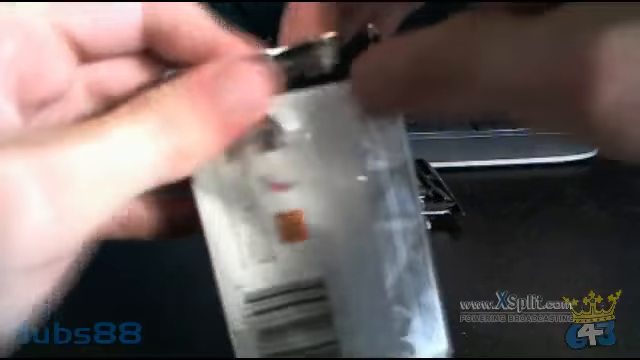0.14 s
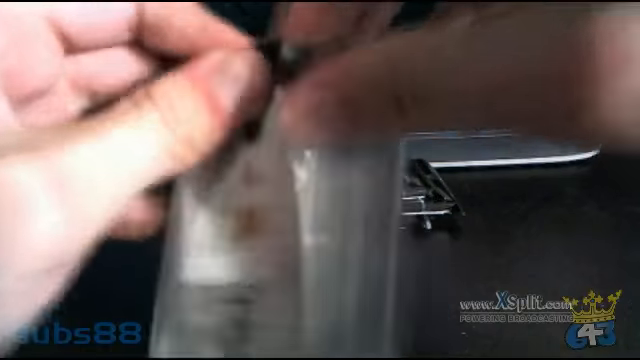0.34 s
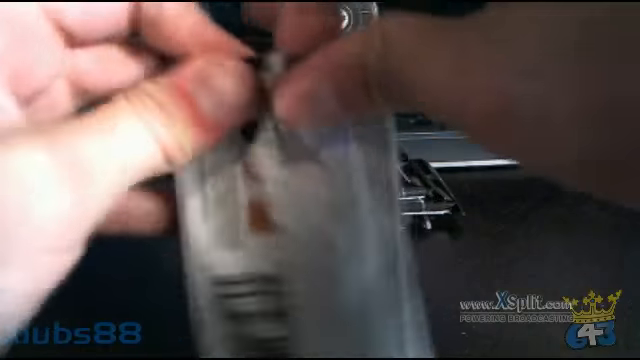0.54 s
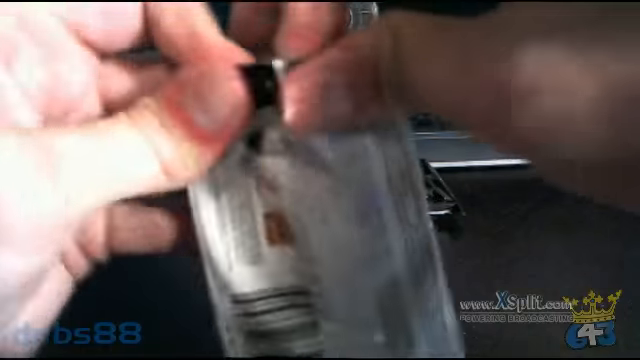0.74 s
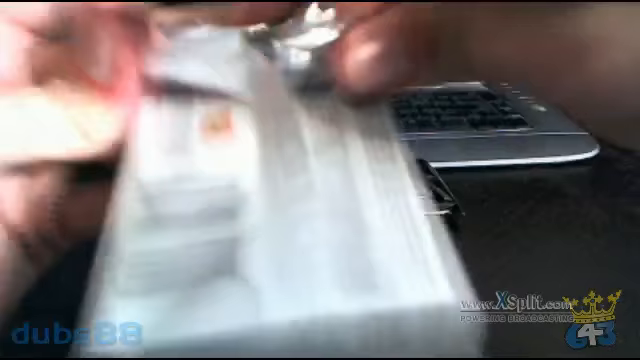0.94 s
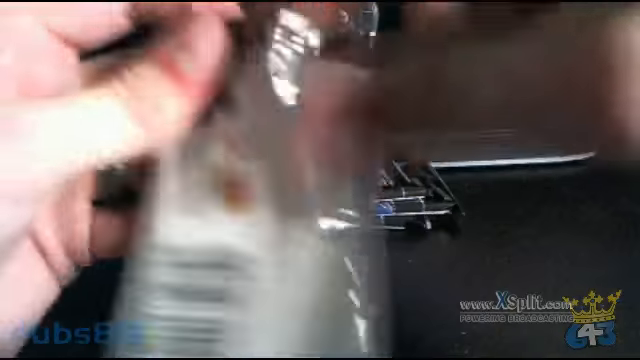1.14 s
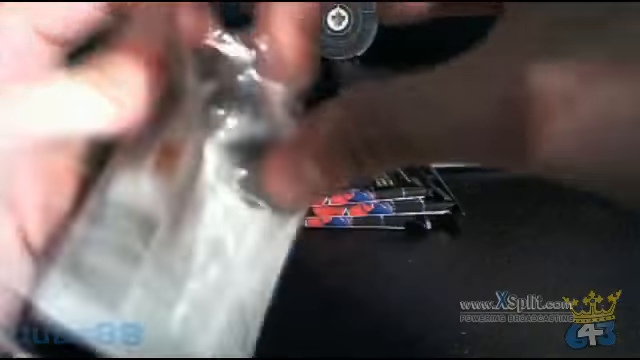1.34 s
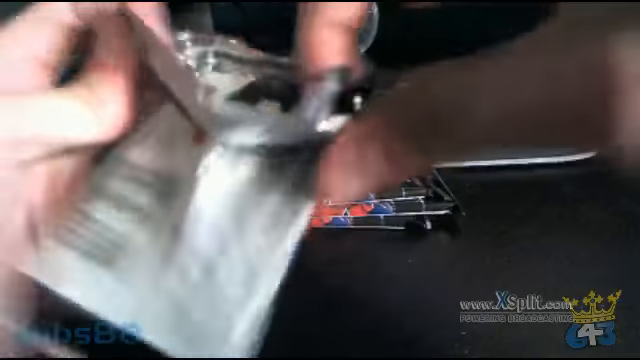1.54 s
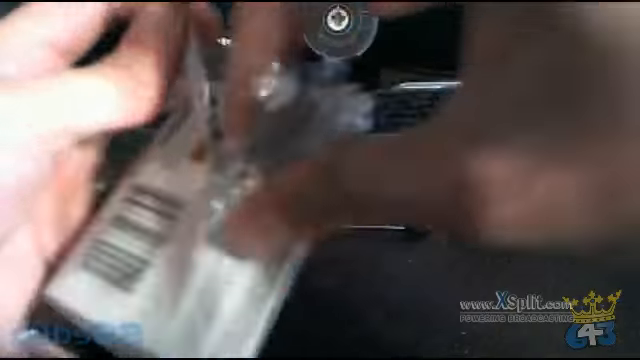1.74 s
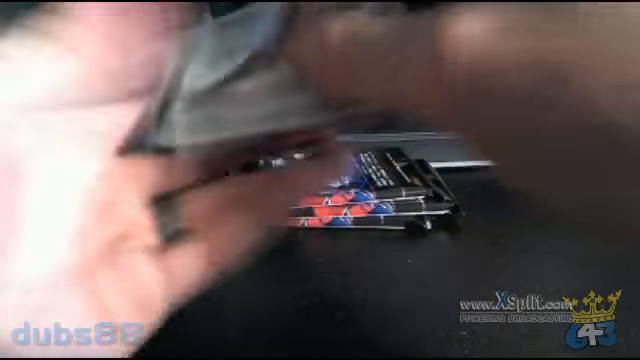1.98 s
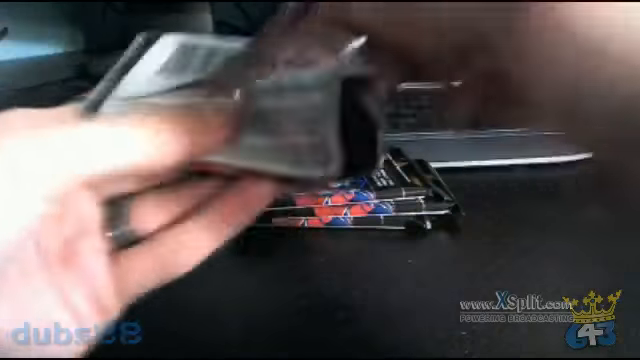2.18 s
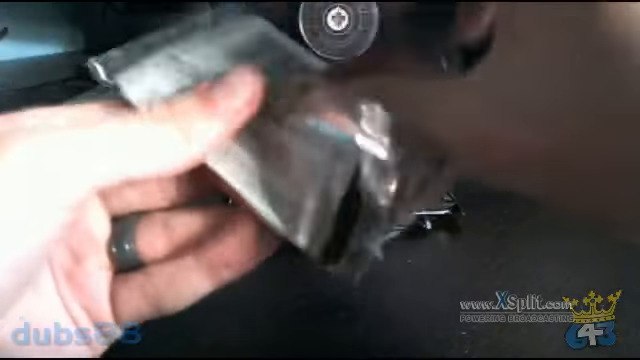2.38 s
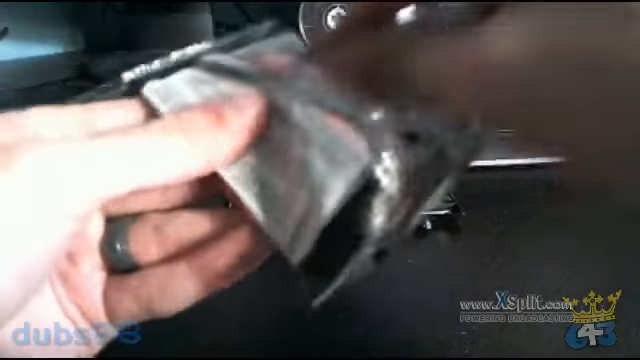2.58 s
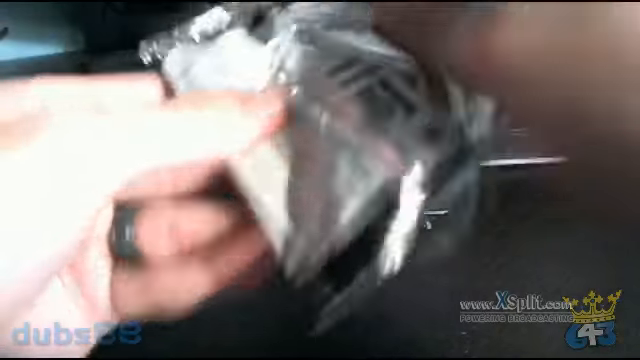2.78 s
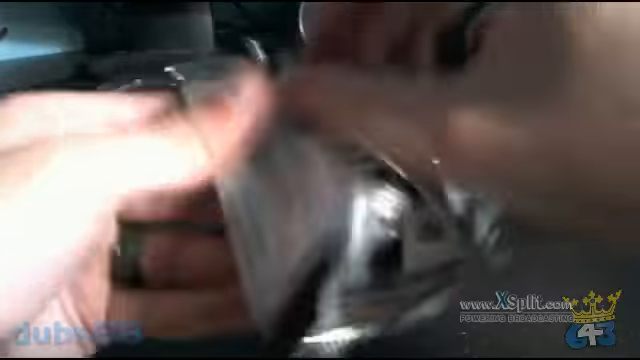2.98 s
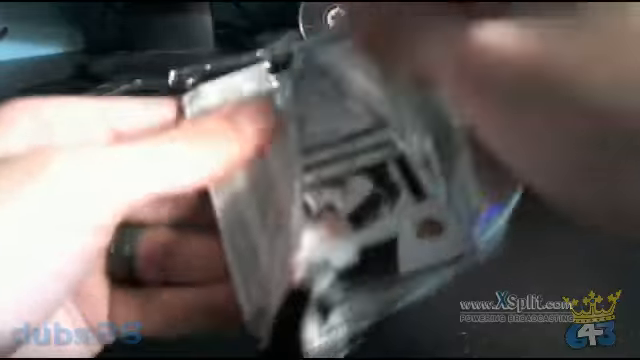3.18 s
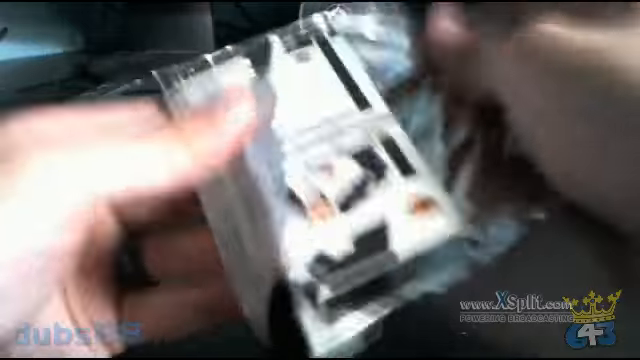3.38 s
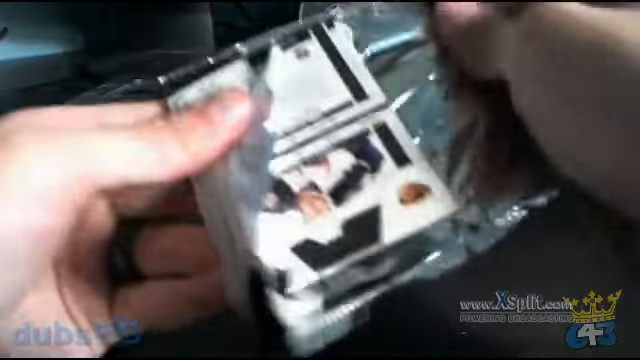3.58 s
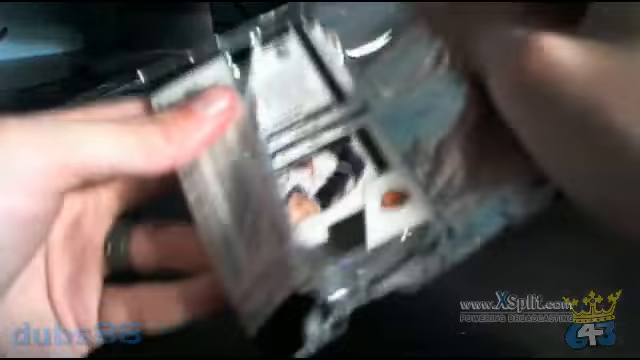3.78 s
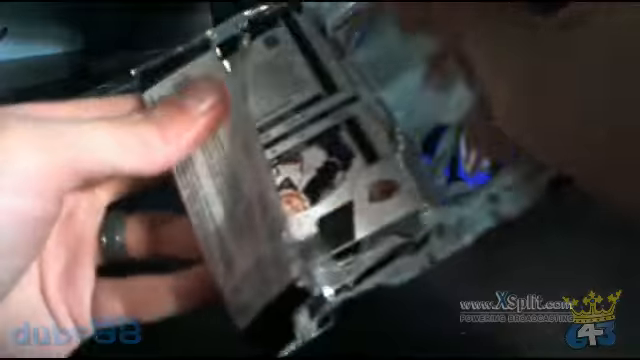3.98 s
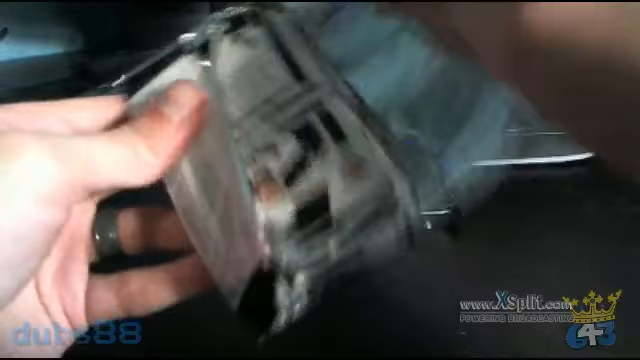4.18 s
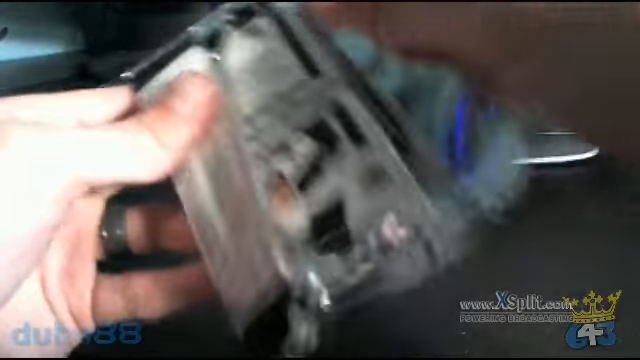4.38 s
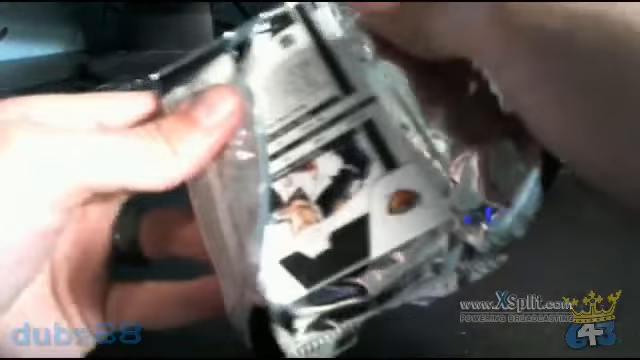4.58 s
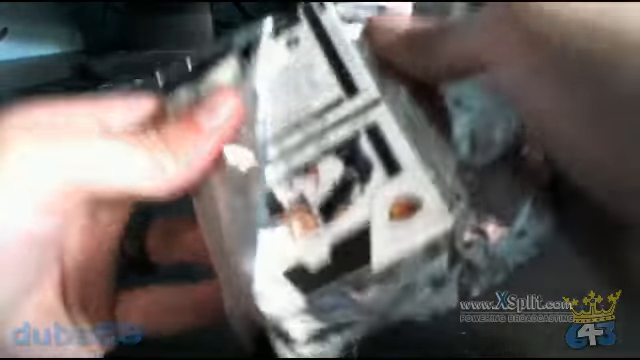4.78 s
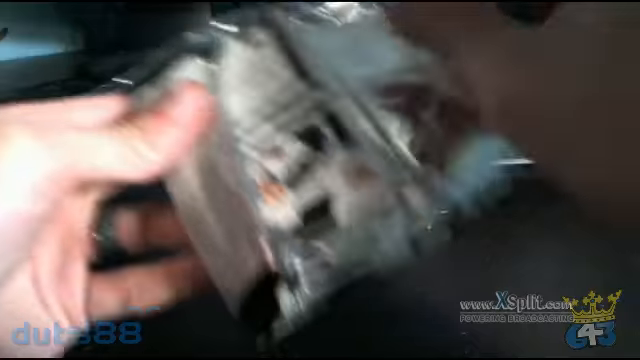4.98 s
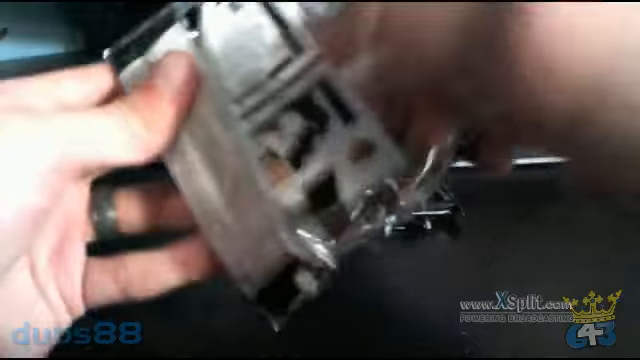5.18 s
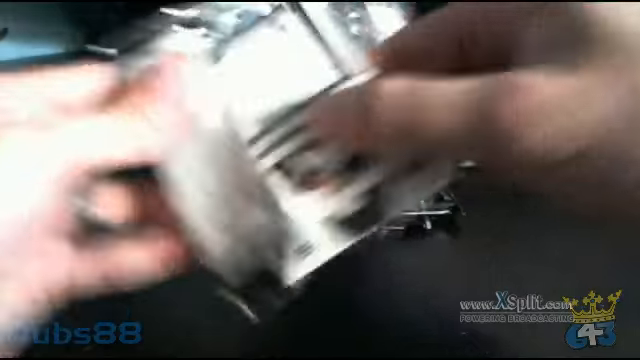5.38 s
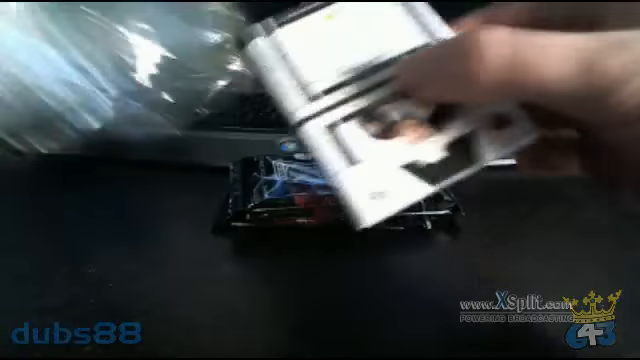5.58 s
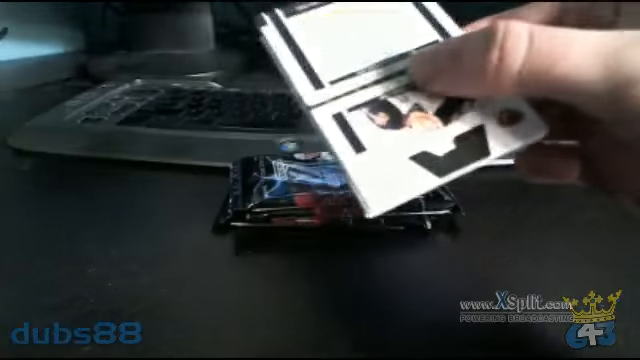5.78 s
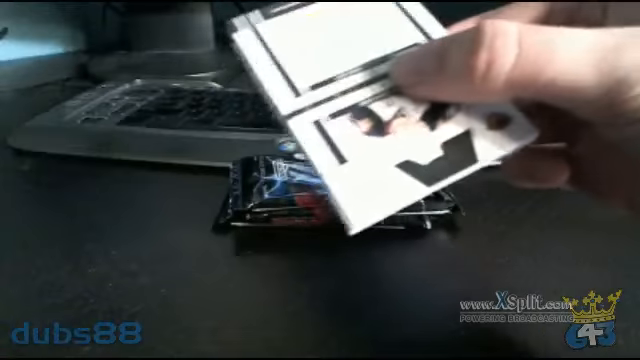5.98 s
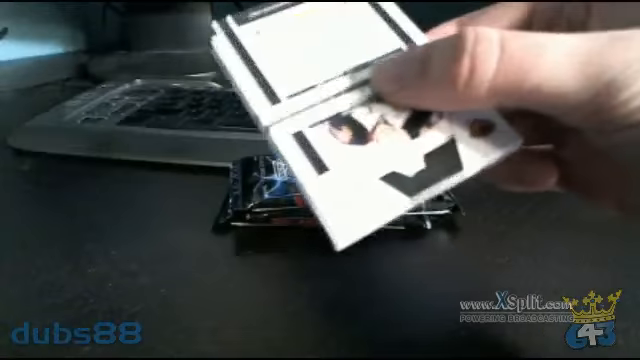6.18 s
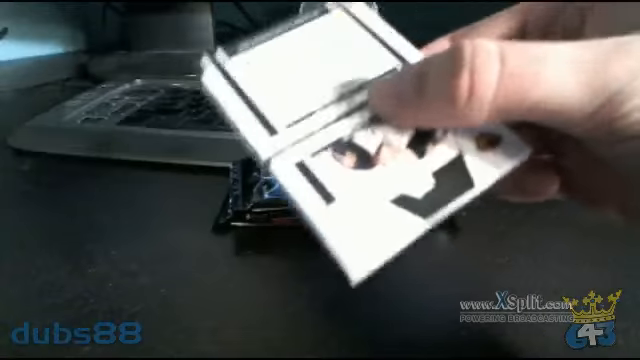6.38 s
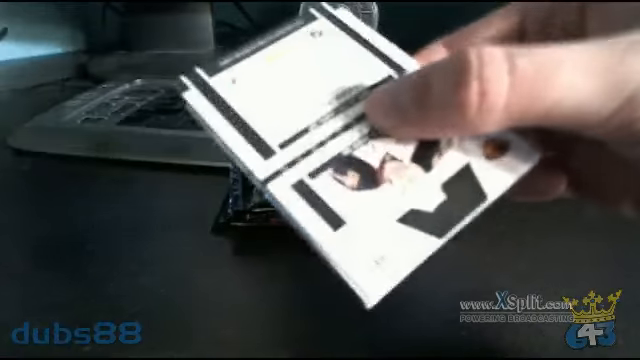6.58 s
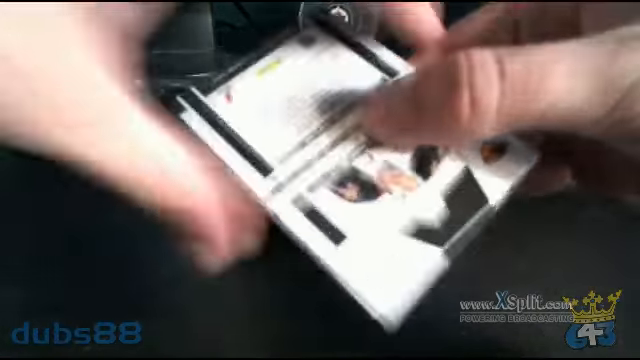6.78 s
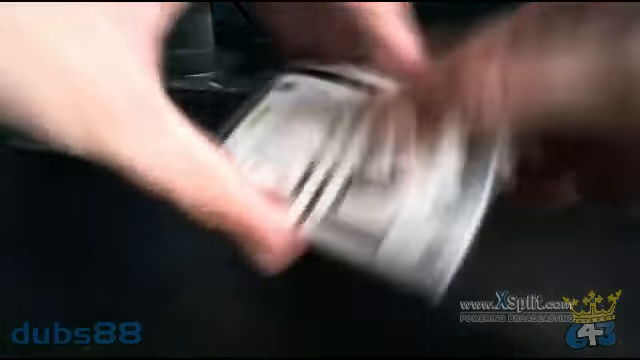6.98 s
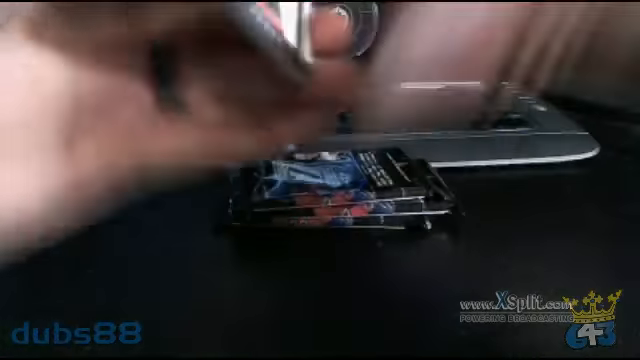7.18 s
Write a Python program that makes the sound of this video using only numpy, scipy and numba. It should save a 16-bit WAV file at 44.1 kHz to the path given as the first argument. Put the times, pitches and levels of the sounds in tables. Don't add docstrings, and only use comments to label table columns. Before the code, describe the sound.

Close, harsh crinkling and ripping of a plastic card packet, with small hollow knocks, giving way to near quiet and a few soft card scrapes.

```python
import sys
import numpy as np
from scipy import signal
from scipy.fft import rfft, irfft, next_fast_len
from scipy.io import wavfile
from scipy.ndimage import uniform_filter1d, minimum_filter1d
from numba import njit

SR = 44100
rng = np.random.default_rng(int(sys.argv[2]) if len(sys.argv) > 2 else 0)


def how_loud(loudness_db):
    steps = np.asarray(loudness_db, float) / 20
    return 10 ** steps


def log_audio(samples):
    frames = np.atleast_2d(samples).T
    limited = np.clip(frames, -1, 1)
    pcm = np.round(limited * 32767).astype(np.int16)
    wavfile.write(sys.argv[1], SR, pcm)


N = 319284

# (start [s], pack rattle re film [dB], pack knock re snap [dB], finger rumble re film [dB])
STAGES = [
    (0, -14.5, -17.5, -17),
    (0.8, -9.5, -17, -15.5),
    (1.5, -12.5, -24.5, -17.5),
    (2.5, -15, -20, -22),
    (3.4, 4.5, -12, -11.5),
    (4.0, 1.5, -18.5, -1),
    (4.449, -11, -17.5, -20),
    (4.95, 0.5, -27.5, -2),
    (5.25, -3.5, -14, -15),
    (5.6, -33, -41, -28.5),
]
# (time [s], peak level [dB], film patch pitch [Hz])
SNAPS = [(0.0054, -13.5, 2750), (0.0399, -14, 2550), (0.1137, -29, 3040), (0.175, -9, 7200),
         (0.184, 1.5, 6840), (0.2115, 1.5, 6000), (0.2763, -7.5, 3570), (0.2897, -2, 3660),
         (0.3108, -4, 4360), (0.332, 1, 4270), (0.3468, -7, 4140), (0.3792, 2.5, 2540),
         (0.3901, -3.5, 5390), (0.57, -14.5, 2840), (0.61, -14.5, 5100), (0.624, -6.5, 4900),
         (0.8236, -11, 1700), (0.997, -6.5, 5000), (1.047, 4.5, 2810), (1.064, 0, 4285),
         (1.0775, -5, 4160), (1.0984, -1.5, 4370), (1.12, 0, 4240), (1.174, -3, 4730),
         (1.2107, -10.5, 4960), (1.292, -10, 4250), (1.3068, -5.5, 3700),
         (1.566, -2.5, 4300), (1.5905, -2, 2950), (1.6117, -2, 3050), (1.6726, 4, 4540),
                (1.6942, 4, 4080), (1.713, -4, 4260), (1.7634, -3.5, 4300), (1.8174, -2.5, 4250),
                (1.8387, 0.5, 3380), (1.87, -0.5, 4580), (1.8855, -10.5, 2760), (1.9102, -10, 4600),
                (1.925, -13, 4700), (1.9835, 1, 4270), (2.159, -6, 4380), (2.183, -7.5, 2910),
                (2.2032, -6, 2630), (2.2185, 0, 2730), (2.254, 1, 5300), (2.3867, -7.5, 3220),
                (2.4673, 0, 3300), (2.482, -3, 3150), (2.5223, -5, 3080),
         (2.7488, 0, 4400), (2.7721, -5, 2620), (2.811, -13, 5140), (2.835, -1, 2670),
              (2.923, 3, 2450), (3.0438, -5, 4390), (3.407, -19, 3580), (3.4146, -2, 4410),
              (3.4548, 0, 3940), (3.4735, -7, 4230), (3.492, -6, 2660), (3.5131, -15, 1950),
              (3.5406, -18, 1990), (3.678, -14, 5500), (3.7212, -4.5, 1630), (3.737, -2.5, 5560),
              (3.7683, -15.5, 2950), (3.782, -18, 3000), (3.8265, -6, 1980), (3.8587, -0.5, 2100),
              (3.897, -15.5, 6300), (4.027, -22, 4200), (4.049, -14.5, 6950), (4.098, -21.5, 5350),
              (4.139, -2, 4870), (4.2757, -20, 6900),
         (4.3897, -0.5, 4520), (4.4428, -2, 5470), (4.4478, 7, 5070), (4.534, -3.5, 5200),
              (4.606, -5, 2700), (4.6262, 3.5, 2160), (4.6647, -5, 5710), (4.7117, -8.5, 4910),
              (4.8425, -13, 5500), (4.8501, -7, 3260), (4.8637, -8.5, 3420), (5.0175, -20, 6850),
              (5.041, -11, 5800), (5.15, -4, 2370), (5.1609, -12, 1640), (5.189, -11.5, 1720),
              (5.2234, -4, 3020), (5.2469, -12, 3330), (5.259, -15, 5340), (5.3415, -17, 4140),
              (5.4029, -12, 2100), (5.4735, -4, 5500), (5.554, -11, 4940), (5.5745, -6.5, 6200),
              (5.637, -19, 7000), (5.699, -8, 2220), (5.712, -14, 2270), (5.7313, -8, 2520)]
# (time [s], peak level [dB], pitch [Hz])
TICKS = [(0.0448, -10, 2460), (0.0893, -25, 3620), (0.153, -24, 3520), (0.1908, -11, 6480),
         (0.1987, -2, 6270), (0.268, -14, 5250), (0.3696, -6, 4450), (0.4683, -3.5, 4320),
         (0.5356, -16, 4350), (0.745, -40, 2600), (0.836, -21, 2670), (0.9601, -1, 3490),
         (0.9662, -3, 3730), (0.9745, -1, 4070), (1.0069, -3, 3840), (1.136, -13, 4230),
         (1.2, -11, 4970), (1.3671, 2, 4270), (1.3764, -11, 4890), (1.4627, 7, 4090),
         (1.5127, -20, 4950), (1.5393, -24, 4220), (1.5586, -9.5, 5200), (1.668, -6.5, 3170),
         (1.6867, -11, 4100), (1.735, -8, 4330), (1.7722, -9, 4430), (1.7895, -2, 6500),
         (1.812, -16, 3100), (1.8911, -11, 4880), (1.9457, -27, 6930), (1.9532, -28, 4600),
         (1.961, -23, 2810), (2.024, -14, 4430), (2.1164, -14, 3950), (2.1734, -7, 4230),
         (2.1888, -4, 2950), (2.2083, -11, 2610), (2.2373, -20, 2130), (2.282, -9, 2420),
         (2.2978, -7, 3530), (2.3255, -6.5, 5380), (2.3597, -19, 2790), (2.3717, -11, 5170),
         (2.425, -32, 2670), (2.4474, -18, 2870), (2.8004, -16, 5540), (2.826, -10, 2780),
         (2.8499, -1, 3010), (2.8715, 1, 4930), (2.9461, -10, 5060), (2.9624, -6, 2940),
         (3.384, -28, 1100), (3.397, -19, 1270), (3.4066, -10, 3700), (3.4245, -8, 5000),
              (3.4497, -4, 5000), (3.5239, -32, 1500), (3.553, -23, 6060), (3.5836, -35, 2830),
              (3.6182, -33, 1150), (3.752, -15, 3380), (3.7984, -14, 6960), (3.834, -0.5, 5730),
              (3.8397, -6, 2600), (3.877, -24, 2670), (3.905, -18, 6300), (3.956, -27, 2700),
              (4.084, -22, 5560), (4.2832, -25, 4250), (4.352, -34.5, 1590), (4.3815, -16.5, 3230),
              (4.41, -6.5, 6210), (4.4334, -22, 2640), (4.4989, -13, 5390), (4.504, -13, 5330),
              (4.5585, -7, 5000), (4.6562, -3.5, 4530), (4.6772, -17, 1890), (4.684, -19, 1110),
              (4.768, -27, 3000), (4.7745, -4.5, 5500), (4.781, -5, 2610), (4.7924, -8, 5950),
              (4.866, -9.5, 6200), (4.8787, -26, 2910), (4.9154, -33, 2790), (4.95, -44, 4370),
              (4.978, -46, 4350), (5.0357, -13, 5500), (5.0493, -8, 5900), (5.121, -18.5, 1700),
              (5.2138, -21, 2900), (5.288, -22, 7140), (5.3256, -20, 6180), (5.3593, -13.5, 5340),
              (5.3958, -18.5, 2200), (5.4178, -27, 4210), (5.4372, -13, 4310), (5.466, -13, 6000),
              (5.478, -10, 4250), (5.481, -12, 4400), (5.5362, -19, 6100), (5.5877, -19.5, 4230),
              (5.647, -19.5, 2600), (5.694, -15, 4500), (5.7783, -23.5, 3335), (6.9493, -28.5, 6560),
              (6.999, -38, 7600)]
# (start [s], length [s], film level [dB], pitch re middle [octaves], rattle re film [dB])
TEARS = [(0.858, 0.21, -14, -0.65, -20.5), (0.859, 0.078, -5, -0.35, -14.5), (1.32, 0.013, -8, 0.26, -13.5),
         (1.394, 0.057, -7, 1, -14.5), (2.263, 0.029, -12, -1.2, -6), (2.522, 0.082, -9.5, 0.77, -19.5),
         (2.554, 0.15, -4.5, -0.4, -15), (2.729, 0.043, -17, -0.59, -14.5),
         (2.855, 0.013, -10, -0.062, -14), (2.884, 0.041, -19.5, -1, 5), (2.944, 0.021, -11, -0.19, -10.5),
         (3.044, 0.049, -13.5, 0.94, -17), (3.062, 0.049, -8, -0.72, -19.5), (3.111, 0.18, -4, -0.56, -15),
         (3.288, 0.048, -19, 0.74, -1.5), (3.43, 0.0072, -14.5, -0.03, 4), (3.828, 0.022, -13.5, -1, -7.5),
         (4.621, 0.055, -25, -0.12, -3), (4.642, 0.0087, -12, 1, -2.5), (4.773, 0.014, -22.5, 0.067, 4)]
# (start [s], length [s], film level [dB], pitch re middle [octaves])
CRUMPLES = [(0.288, 0.031, -17, -1.5), (0.366, 0.029, -21, -3), (0.457, 0.02, -20.5, 0.1),
            (0.531, 0.031, -31, 0.5), (1.093, 0.023, -27.5, 0), (1.709, 0.0092, -14, -0.9),
            (1.778, 0.014, -15.5, 0.2), (1.861, 0.035, -29, 0), (2.065, 0.015, -11.5, -0.5),
            (2.128, .011, -14.5, -0.3), (2.317, 0.011, -13.5, -0.3), (2.985, 0.057, -26.5, 1),
            (3.904, 0.016, -39, 1), (4.117, 0.032, -28.5, 1), (4.681, 0.03, -26, -1),
            (4.839, 0.026, -31, 0), (5.039, 0.016, -22.5, 0), (5.426, 0.015, -27, 0),
            (5.469, 0.0086, -23, 0.5), (5.485, 0.014, -29, 0.7), (5.55, 0.034, -32, -0.5),
            (5.777, 0.011, -36.5, 4.5)]
# (start [s], length [s], film level [dB], pitch re middle [octaves])
RUSTLES = [(.005, 0.036, -23.5, 0.44), (0.088, 0.07, -40, 0.5), (0.17, 0.18, -31, 0.5),
           (0.453, .19, -41, 0.5), (1.066, 0.11, -35, 0.1), (1.305, 0.17, -16, 0.33),
           (1.547, 0.058, -24.5, 0), (1.657, 0.17, -25.5, -0.2), (1.93, .04, -41.5, 1),
           (1.975, 0.2, -27, 0), (2.13, 0.17, -22.5, 0), (2.252, 0.12, -27, 0.2), (2.436, 0.042, -23, 0.2),
           (2.821, 0.13, -18, -0.15), (3.335, 0.028, -35, -10), (3.4, 0.096, -24.5, -2),
           (3.667, 0.2, -40, 1), (4.072, 0.048, -47.5, 0.5), (4.173, 0.068, -53.5, 0.2),
           (4.381, 0.079, -29, -0.2), (4.449, 0.13, -30.5, 0.5), (4.665, 0.15, -45.5, -0.5),
           (5.055, 0.1, -34.5, .9), (4.87, 0.045, -56, 0), (5.258, 0.097, -47.5, 0.5),
           (5.345, 0.068, -32.5, 0.5), (5.398, 0.2, -45, 1.5), (5.689, 0.067, -24, -0.27)]
# (start [s], end [s], hiss level [dB], pitch re middle [octaves], pack rattle re hiss [dB])
SLIDES = [
    (5.96, 6.16, -62, 0.61, -19),
    (6.029, 6.062, -37.5, -1.17, -27),
    (6.03, 6.068, -49, 1, -29),
    (6.469, 6.528, -40.5, 0.34, -13.5),
    (6.543, 6.584, -55.5, 1, -23.5),
    (6.762, 6.822, -49, 0.74, -13.5),
    (6.933, 7.023, -44.5, 0.65, -25),
]
# (time [s], peak level [dB], pitch [Hz])
KNOCKS = [(0.004, -17.5, 742), (0.141, -21, 1056), (0.622, -16.5, 880), (0.823, -23, 877),
          (1.318, -11.5, 820), (1.674, -10.5, 717), (1.983, -12.5, 830), (2.064, -29, 720),
          (2.159, -11.5, 727), (2.261, -18.5, 714), (2.904, -4, 786), (3.062, -4, 804), (3.295, -1.5, 864),
          (3.34, -11.5, 890), (3.43, -14, 700), (3.456, -3.5, 790), (3.705, -18, 770), (3.718, -9, 738),
          (3.767, -14, 740), (4.138, -6, 785), (4.442, -13.5, 714), (4.559, -0.5, 705), (4.631, -8, 730),
          (4.653, -3.5, 800), (4.774, -10.5, 644), (5.036, -23, 820), (5.149, -17.5, 570),
          (0.3253, -18.5, 840), (0.3455, -13, 784), (0.5849, -32, 755), (1.001, -22, 610),
          (1.0594, -11.5, 710), (1.3531, -16.5, 700), (1.3888, -17, 730), (2.0755, -18, 695),
          (2.3103, -13, 450), (2.441, -20.5, 696), (2.8091, -17.5, 865), (2.8675, -16.5, 805),
          (3.2164, -12, 815), (3.239, -9, 790), (3.737, -13.5, 710), (3.917, -19, 703),
          (5.1304, -23.5, 410), (5.1885, -27, 850)]
# (time [s], peak level [dB], pitch [Hz])
BUMPS = [
    (0.625, -30.5, 280),
    (3.455, -18, 199),
    (3.918, -26.5, 330),
    (3.946, -35.5, 255),
    (4.231, -37.5, 320),
    (1.675, -25, 236),
    (4.386, -22.5, 208.5),
    (6.497, -45, 238),
]
# (start [s], length [s], level [dB], start pitch [Hz], end pitch [Hz])
POCKETS = [(0.013, 0.042, -27.5, 2334, 2510), (0.092, 0.042, -36, 3500, 3300),
           (0.521, 0.062, -28, 2800, 3330), (1.95, 0.094, -34.5, 2920, 2730),
           (2.122, 0.057, -26, 2600, 2760), (2.255, 0.04, -25, 5360, 5190),
           (2.982, 0.039, -22.5, 4590, 4850), (3.345, 0.067, -33.5, 1000, 1190),
           (3.495, 0.062, -32, 1096, 1690), (4.089, 0.092, -31, 321, 429), (5.295, 0.092, -33, 6020, 4500),
           (5.347, 0.044, -35.5, 805, 745), (6.021, 0.05, -45, 1193, 1624),
           (6.456, 0.06, -42.5, 2740, 2605), (6.76, 0.057, -46, 4610, 4420), (6.937, 0.09, -45, 3000, 2400)]
# (frequency [Hz], level [dB])
FILM = [(1200, -18), (1900, -16), (2700, -9.5), (3600, -12), (4400, -9.5), (5500, -7.5), (6500, -9),
        (7400, -8.5), (8300, -10), (9300, -32)]
# (frequency [Hz], width [Hz], level [dB])
PACK = [(710, 122, -3.5), (413, 220, -10.5), (1000, 1240, -8)]
# (frequency [Hz], level [dB])
FINGERS = [(20, -26.5), (50, -10.5), (170, 0), (300, -4.5), (450, -7.5), (900, -39)]
# (frequency [Hz], density [dB per Hz])
FAN = [(40, -33), (110, -24), (210, -5.5), (330, -20.5), (600, -21), (1000, -23), (4000, -35.5),
       (7500, -39), (9000, -64.5)]
# (frequency [Hz], width [Hz], level [dB])
FAN_LINES = [(420, 12, -73.5), (541.6, 15, -71.5)]

PATCH_HZ, MIDDLE_HZ = np.array([800, 1700, 2600, 3800, 5500, 10000]), 3000
LOAD_S = .001
KNOCK_DB_PER_OCTAVE = -5
SETTLE_DB, SETTLE_S, HELD_DB, PUT_DOWN_S = -26.5, 0.035, -62, 5.85
DESK_T60_S, DESK_DB = 0.028, -13
FAN_DB = -60
OVERLOAD = .73


def level(x, db):
    return x * how_loud(db) / np.sqrt(np.mean(x ** 2))


def colour(x, points):
    hz, db = np.transpose(points)
    size = next_fast_len(N)
    bins = np.log(np.fft.rfftfreq(size, 1 / SR) + 1)
    gain = how_loud(np.interp(bins, np.log(hz), db))
    return irfft(rfft(x, size) * gain, size)[:N]


def resonate(x, hz, width_hz):
    return signal.lfilter(*signal.iirpeak(hz, hz / width_hz, fs=SR), x)


def walk(rate_hz):
    k = int(SR / rate_hz)
    held = np.repeat(rng.standard_normal(N // k + 1), k)
    return 0.77 * uniform_filter1d(held, k)[:N]


@njit
def add_rings(start, hz, t60, size, turn, quick):
    out = np.zeros(N)
    for g in range(len(start)):
        fall = np.exp(-np.log(1000) / (t60[g] * SR))
        p = fall * np.exp(2j * np.pi * hz[g] / SR)
        z = size[g] * np.exp(1j * turn[g])
        rise, step = 1., fall ** quick
        for i in range(start[g], min(N, start[g] + int(t60[g] * SR))):
            z, rise = z * p, rise * step
            out[i] += z.imag * (1 - rise)
    return out


def ring(start_s, hz, t60_s, db, quick, turn=0.0):
    settings = np.broadcast_arrays(start_s * SR, hz, t60_s, how_loud(db), turn)
    start, *rest = [np.ravel(c).astype(float) for c in settings]
    return add_rings(start.astype(int), *rest, quick)


def stage(s, column):
    rows = np.array(STAGES)
    return rows[np.searchsorted(rows[1:, 0], s), column]


def snap_rows():
    s, db, hz = np.transpose(SNAPS)
    knock_db = stage(s, column=2) + KNOCK_DB_PER_OCTAVE * np.log2(hz / MIDDLE_HZ)
    return np.transpose([s, db + 1.0, hz, knock_db])


def snaps(count=6, cycles=11, lag_s=0.0037, others_db=-7, gain_db=3, knock_hz=720, knock_t60_s=0.028):
    s, db, hz, knock_db = (c[:, None] for c in snap_rows().T)
    lag, size, turn = rng.random((3, len(s), count))
    other = np.arange(count) > 0
    start_s = s + LOAD_S + other * lag_s * (lag - .3)
    other_hz = hz ** .6 * (600 + 11000 * size) ** (1 - .6)
    pitch = np.where(other, other_hz, hz)
    t60_s = cycles / np.sqrt(pitch * MIDDLE_HZ)
    film = ring(start_s, pitch, t60_s, db + gain_db + other * others_db, 3.7, 2 * np.pi * turn)
    note = knock_hz * (0.87 + 0.38 * rng.random(s.shape))
    knock = ring(start_s[:, :1], note, knock_t60_s, db + knock_db, 2.3)
    return film + crack(start_s[:, :1], db, hz) + knock


def ticks(count=4, cycles=12, others_db=-6, gain_db=5, lag_s=0.0013):
    s, db, hz = (c[:, None] for c in np.transpose(TICKS))
    size, lag, turn = rng.random((3, len(s), count))
    other = np.arange(count) > 0
    pitch = np.where(other, np.sqrt(hz * (900 + 10500 * size)), hz)
    start_s = s + LOAD_S / 2 + other * lag_s * (lag - .3)
    t60_s = cycles / np.sqrt(pitch * MIDDLE_HZ)
    film = ring(start_s, pitch, t60_s, db + gain_db + other * others_db, 4.5, 2 * np.pi * turn)
    return crack(start_s[:, :1], db, hz) + film


def crack(start_s, db, hz, t60_s=.0011, gain_db=-2.):
    return ring(start_s, hz, t60_s, db + gain_db, 20.)


def effort(table, rise_ms, fall_share, spread, widen, swell=0):
    octave = np.log2(np.sqrt(PATCH_HZ[1:] * PATCH_HZ[:-1]) / MIDDLE_HZ)
    power = np.zeros((len(octave) + 1, N))
    for s, end, db, centre, rattle_db in table:
        a, b = max(int((s - .03) * SR), 0), min(int((end + .15) * SR), N)
        ms = (np.arange(a, b) / SR - s) * 1000
        length_ms = max(end - s, .002) * 1000
        rise = np.minimum(ms, 0) / rise_ms
        fall = np.maximum(ms - length_ms, 0) / (1 + fall_share * min(length_ms, 50))
        shape = np.exp(rise - fall)
        shape *= 1 - min(swell, .95) * np.exp(-np.maximum(ms, 0) / (0.78 * length_ms))
        width = max(spread + widen * (db + 49.5), .4)
        share = np.exp(-.5 * ((octave - centre) / width) ** 2)
        gains = np.append(share / share.mean(), how_loud(2 * rattle_db))
        power[:, a:b] += how_loud(2 * db) * shape * gains[:, None]
    return power


def spans(table):
    return [(s, s + length, *rest) for s, length, *rest in table]


def with_rattle(table):
    return [(*row, stage(row[0], column=1)) for row in spans(table)]


def rips():
    moves = with_rattle(CRUMPLES) + spans(TEARS)
    creaks = [(s, s + 0.0033, db - 23.5, np.log2(hz / MIDDLE_HZ), knock_db + 11.5)
              for s, db, hz, knock_db in snap_rows()]
    pulled = effort(moves, rise_ms=1.0, fall_share=0.13, spread=0.6, widen=0.015, swell=.4)
    return pulled, effort(creaks, rise_ms=1.0, fall_share=0.55, spread=1.0, widen=0)


def rustles():
    return effort(with_rattle(RUSTLES), rise_ms=1.0, fall_share=.14, spread=0.49, widen=0.0036, swell=0.9)


def slides():
    return effort(SLIDES, rise_ms=1.74, fall_share=0.17, spread=0.58, widen=0, swell=0.2)


def settle(power):
    keep = np.exp(-1 / (SETTLE_S * SR))
    after = how_loud(2 * SETTLE_DB) * signal.lfilter([1 - keep], [1, -keep], power.mean(axis=0))
    held = how_loud(2 * HELD_DB) * (np.arange(N) < PUT_DOWN_S * SR)
    return after + held


def creases(per_s=4000, cycles=10, scatter_db=4.0, hiss_db=-9):
    when, size, strength, turn = rng.random((4, int(per_s * N / SR)))
    pitch = 800 + 8600 * size
    db = -scatter_db * np.log(strength + 0.0014) + 10 * np.log10(pitch)
    grains = ring(when * N / SR, pitch, cycles / pitch, db, 4.7, 2 * np.pi * turn)
    return level(grains, 0) + level(rng.standard_normal(N), hiss_db)


def patches(x, patchy_db):
    sheet = level(colour(x, FILM), 0)
    bands = []
    for edge in zip(PATCH_HZ, PATCH_HZ[1:]):
        band = signal.butter(2, edge, "band", fs=SR, output="sos")
        bands.append(signal.sosfiltfilt(band, sheet) * how_loud(patchy_db * walk(35)))
    return np.array(bands)


def kicks(share, scatter_db):
    chance, sign, strength = rng.random((3, N))
    pushes = (chance < share) * np.sign(sign - .5)
    return level(pushes * how_loud(-scatter_db * np.log(strength)), 0)


def pack(push, gain_db=17):
    pushed = push * kicks(0.099, 2.64)
    return how_loud(gain_db) * sum(how_loud(db) * resonate(pushed, hz, width_hz) for hz, width_hz, db in PACK)


def knocks(t60_s=0.024, gain_db=5.0, upper=1.7, upper_db=-14):
    s, db, hz = np.transpose(KNOCKS)
    low = ring(s, hz, t60_s, db + gain_db, 3.6)
    return low + ring(s, upper * hz, t60_s, db + gain_db + upper_db, 2.5)


def bumps(t60_s=0.032):
    s, db, hz = np.transpose(BUMPS)
    return ring(s, hz, t60_s, db + 13.0, 6.5)


def fingers(push, smear_s=0.0095):
    slow = np.sqrt(np.abs(uniform_filter1d(push ** 2, int(smear_s * SR))))
    return slow * level(colour(kicks(0.018, 3.7), FINGERS), 0)


def pockets(width=.22, edge=0.58):
    out = np.zeros(N)
    noise = rng.standard_normal((2, N))
    for s, length_s, db, hz, end_hz in POCKETS:
        a, n = int(s * SR), int(length_s * SR)
        k = max(int(SR / (width * (hz + end_hz))), 2)
        wobble = uniform_filter1d(uniform_filter1d(noise[:, a:a + n], k), k)
        turn = 2 * np.pi * np.cumsum(np.geomspace(hz, end_hz, n)) / SR
        hiss = wobble[0] * np.cos(turn) + wobble[1] * np.sin(turn)
        out[a:a + n] += level(hiss, db) * np.hanning(n) ** edge
    return out


def desk(near):
    t = np.arange(SR // 5) / SR
    blur = rng.standard_normal(len(t)) * how_loud(-60 * t / DESK_T60_S) * (t > .001)
    blur *= how_loud(DESK_DB) / np.sqrt(np.sum(blur ** 2))
    return signal.fftconvolve(near, blur)[:N]


def fan():
    air = level(colour(rng.standard_normal(N), FAN), FAN_DB) * how_loud(.8 * walk(4.9))
    return air + sum(level(resonate(rng.standard_normal(N), hz, width_hz), db) for hz, width_hz, db in FAN_LINES)


def scene():
    pulled, creaks = rips()
    rustle = rustles()
    rip = pulled + rustle
    rip[:-1] += settle(rip[:-1])
    rubbed = 0.25 * rustle
    rip = rip + creaks - rubbed
    slide = slides() + rubbed
    torn = np.sqrt(rip[:-1]) * patches(creases(), 2.2)
    slid = np.sqrt(slide[:-1]) * patches(rng.standard_normal(N), 3.3)
    film = np.sum(torn + slid, axis=0)
    both = rip + slide
    rumble = how_loud(stage(np.arange(N) / SR, column=3))
    rub = fingers(np.sqrt(both[:-1].mean(axis=0)) * rumble)
    low = pack(np.sqrt(both[-1])) + rub + bumps() + knocks()
    near = film + snaps() + ticks() + low + pockets()
    return (near + desk(near) + fan())[None]


def smear(x, early_db=-24, t60_s=0.018):
    t = np.arange(SR // 20) / SR
    early = rng.standard_normal(len(t)) * how_loud(-60 * t / t60_s)
    early *= how_loud(early_db) / np.sqrt(np.sum(early ** 2))
    return x + signal.fftconvolve(x[:, ::-1], early[None])[:, :N][:, ::-1]


def overload(x):
    room_left = np.minimum(1, OVERLOAD / (np.abs(x) + 1e-9))
    return x * uniform_filter1d(minimum_filter1d(room_left, size=3), size=3)


def band_limit(x):
    return signal.sosfilt(signal.butter(12, 16660, fs=SR, output="sos"), x)


def record(dry):
    narrow = signal.sosfilt(signal.cheby2(8, 70, 10600, fs=SR, output="sos"), smear(dry))
    top = signal.sosfiltfilt(signal.butter(14, 15700, fs=SR, output="sos"), overload(narrow))
    return band_limit(top)


dry = scene()
out = record(dry)
log_audio(out)
```